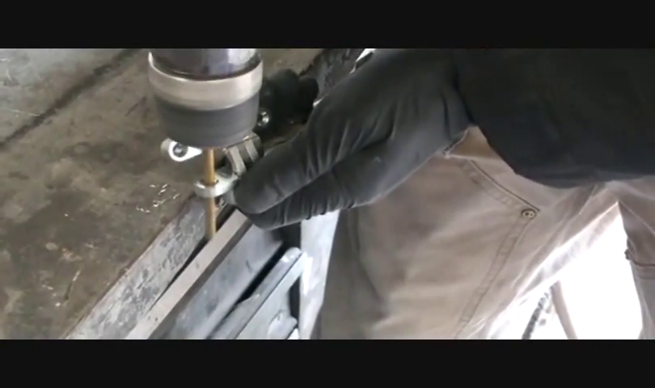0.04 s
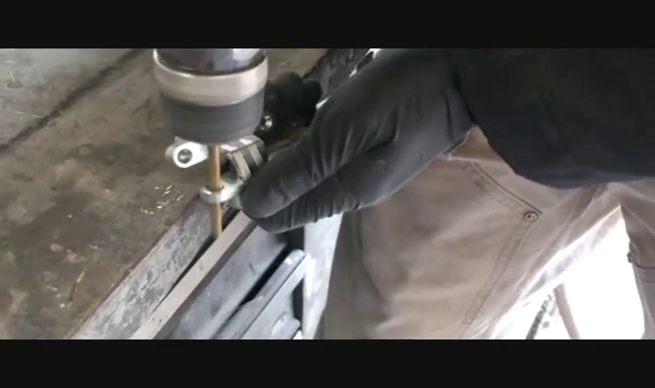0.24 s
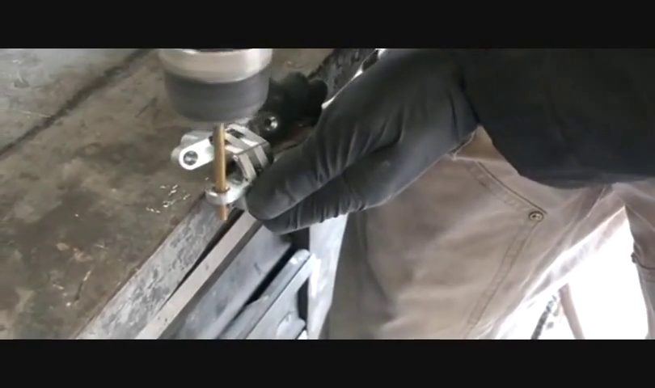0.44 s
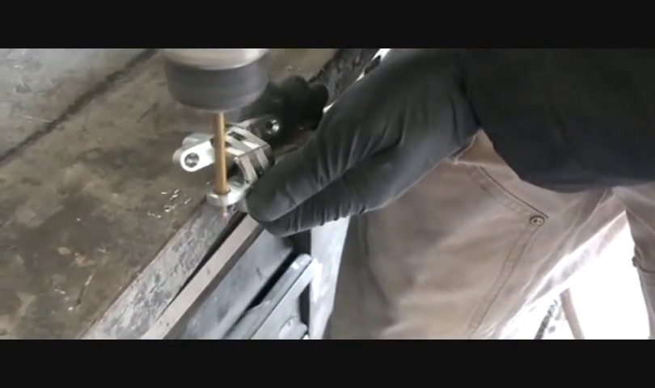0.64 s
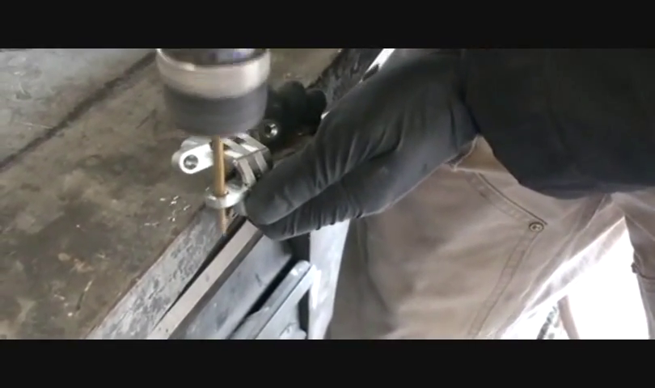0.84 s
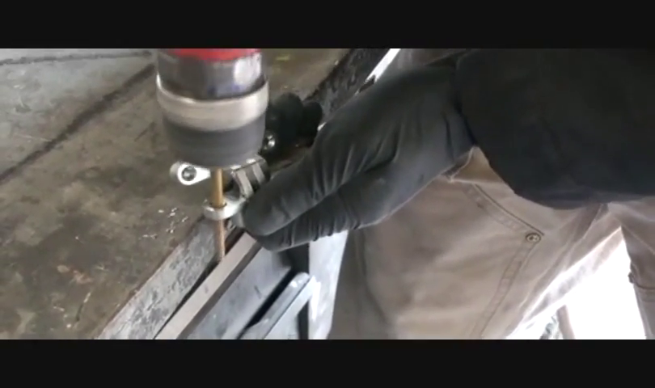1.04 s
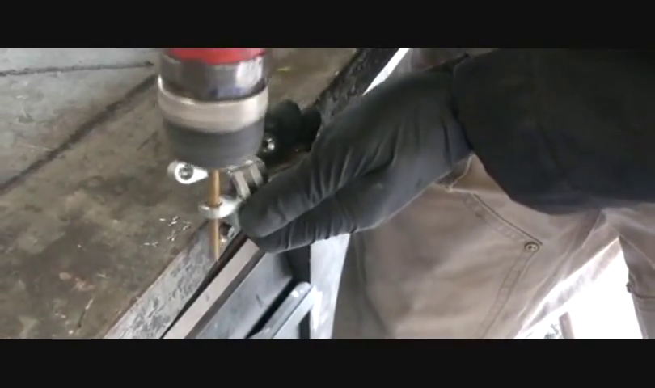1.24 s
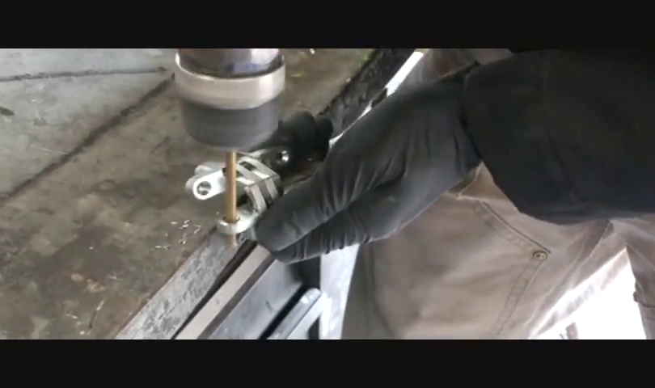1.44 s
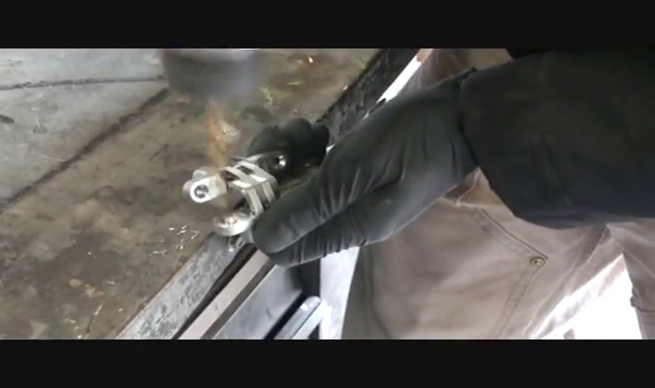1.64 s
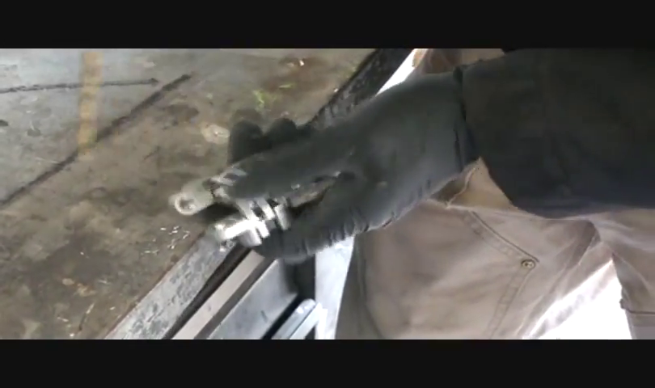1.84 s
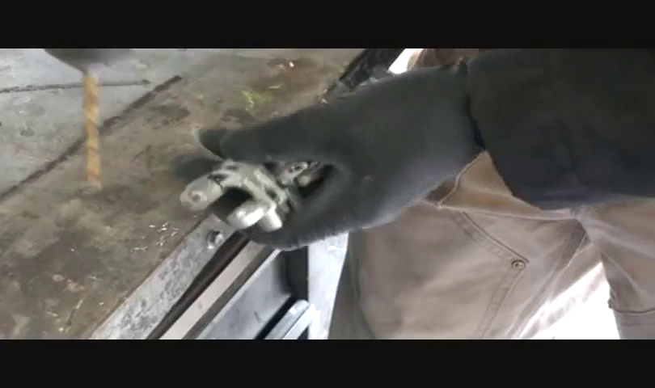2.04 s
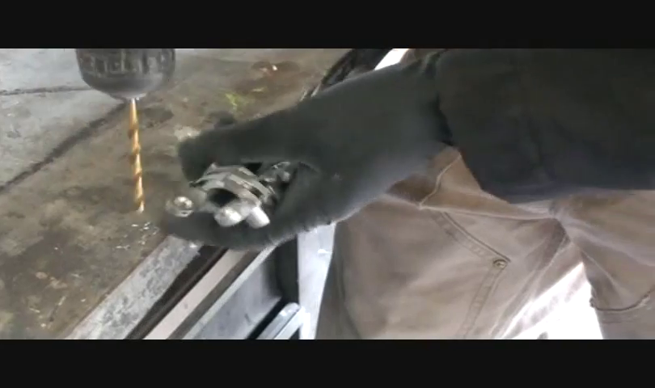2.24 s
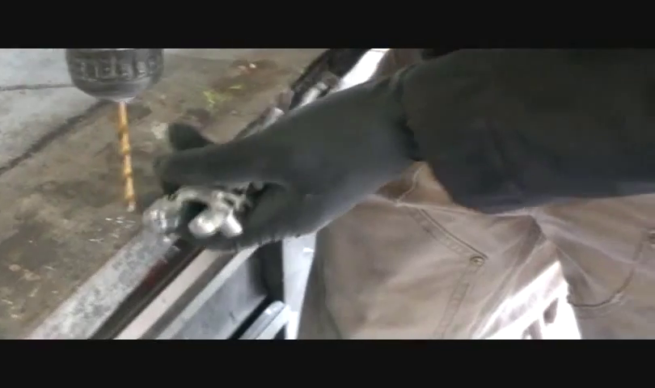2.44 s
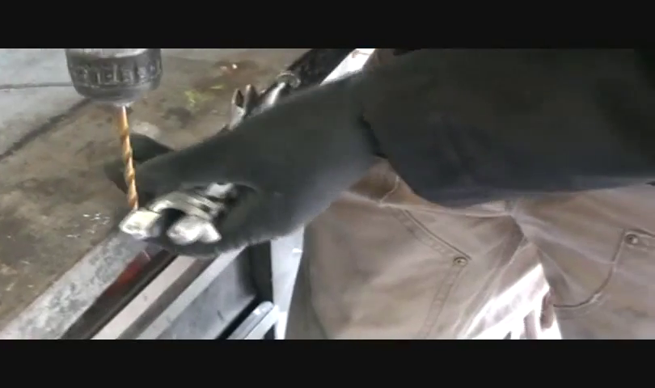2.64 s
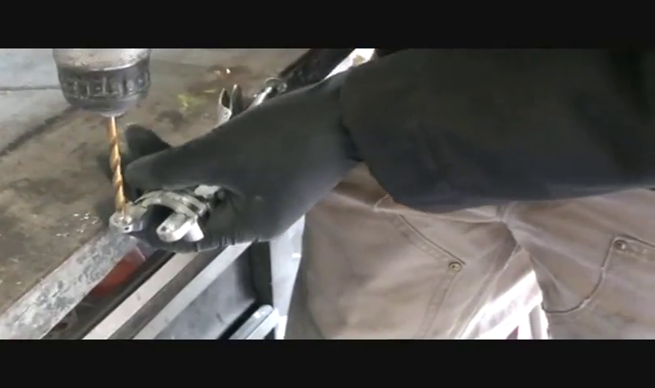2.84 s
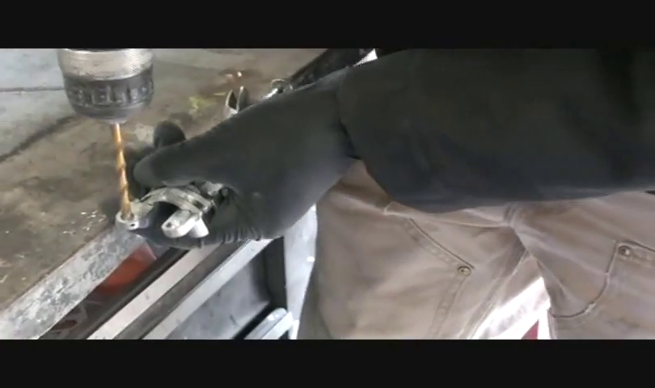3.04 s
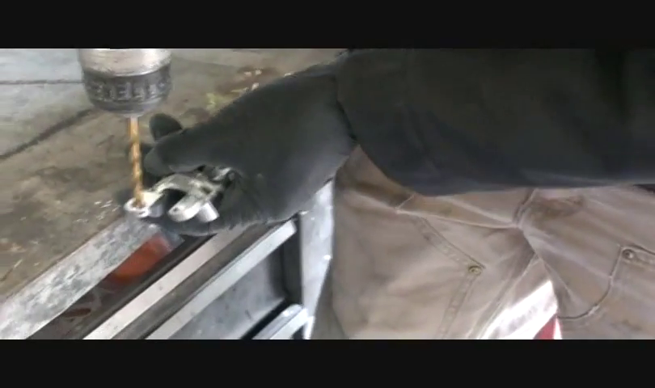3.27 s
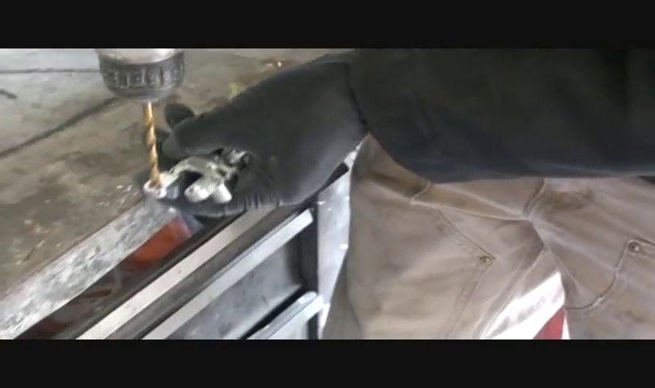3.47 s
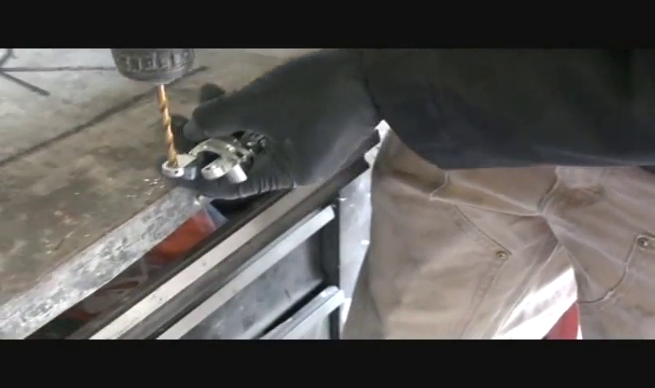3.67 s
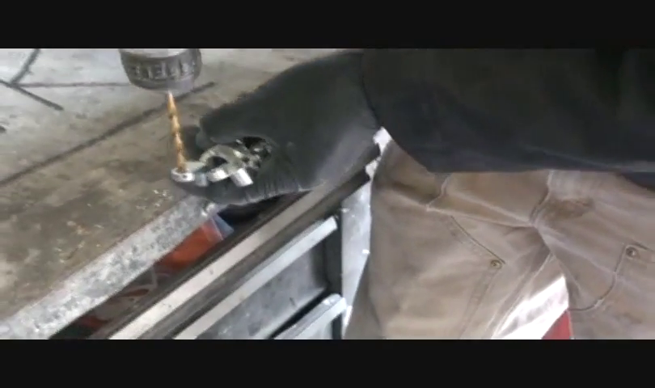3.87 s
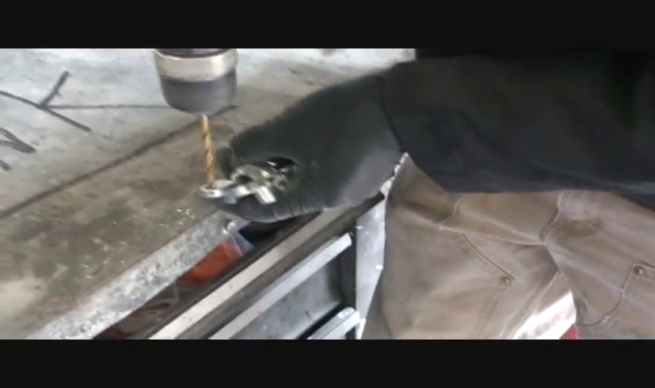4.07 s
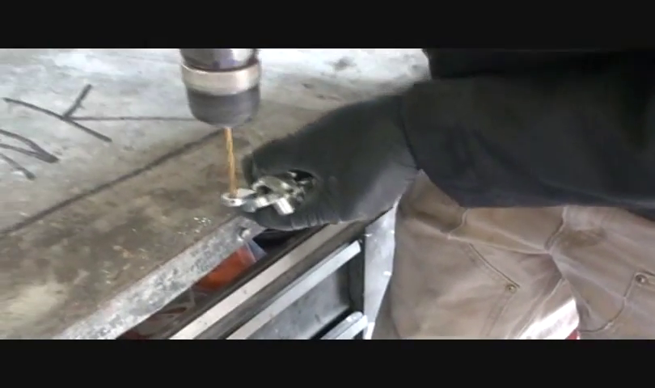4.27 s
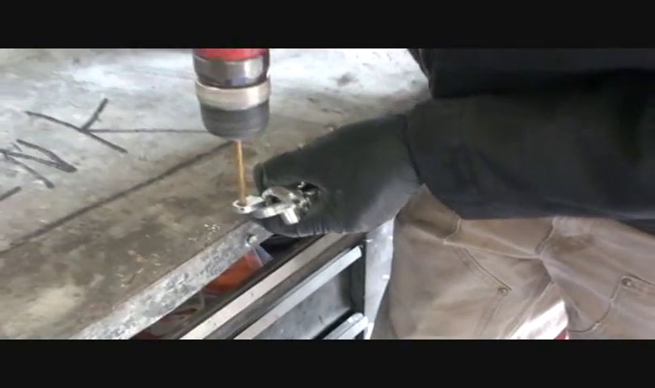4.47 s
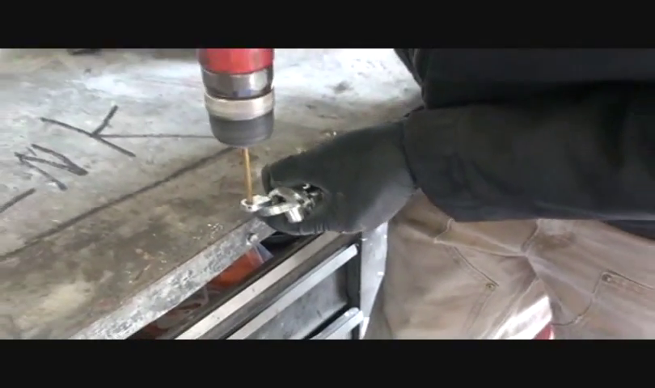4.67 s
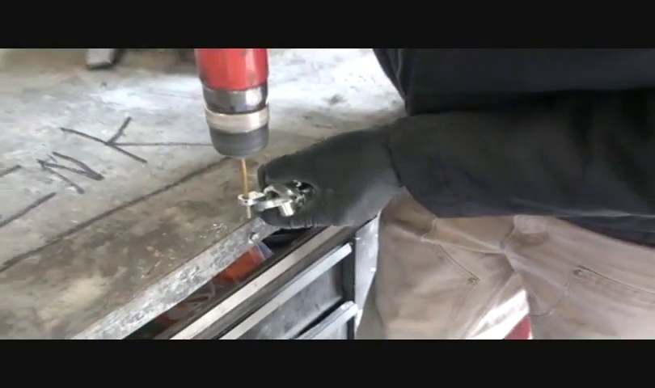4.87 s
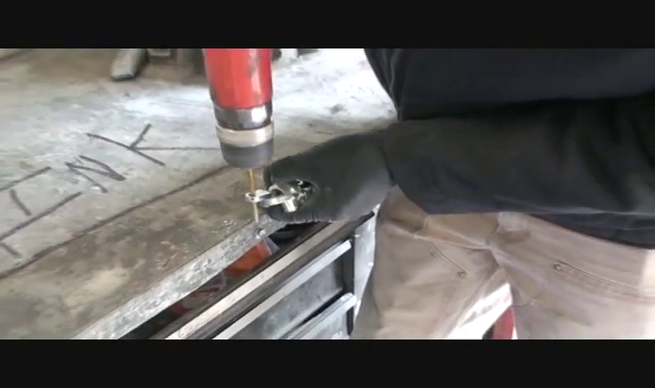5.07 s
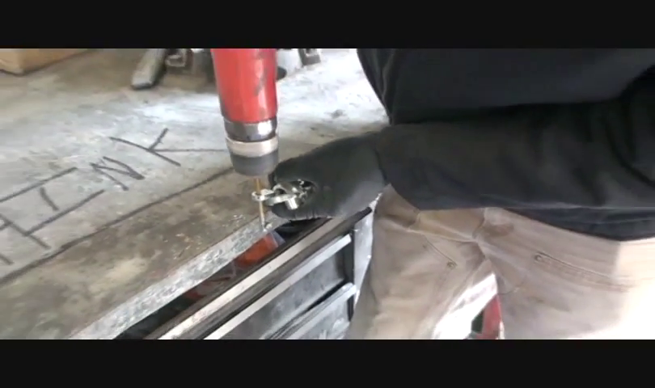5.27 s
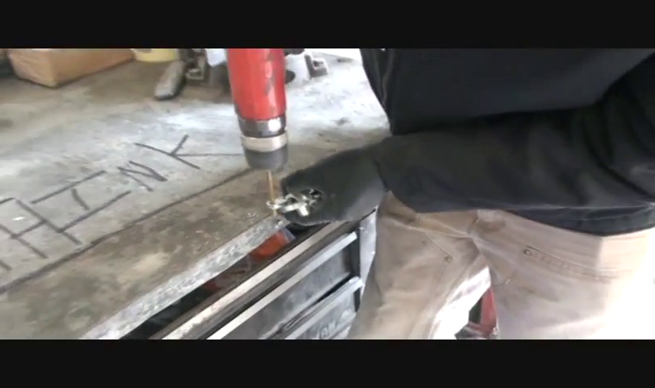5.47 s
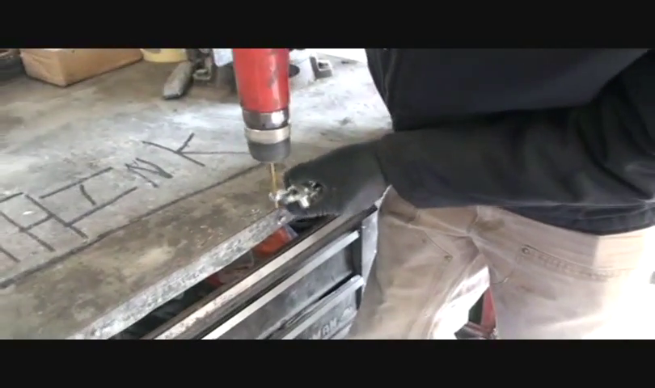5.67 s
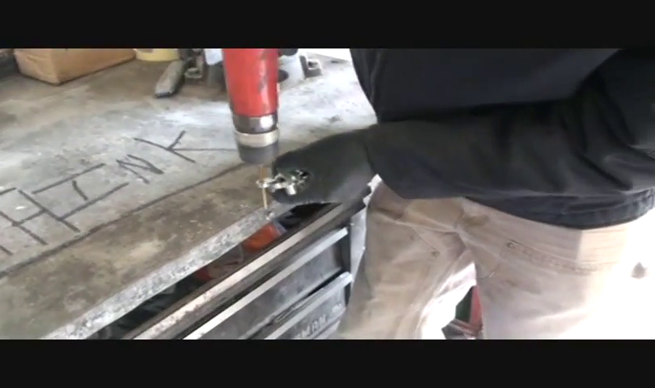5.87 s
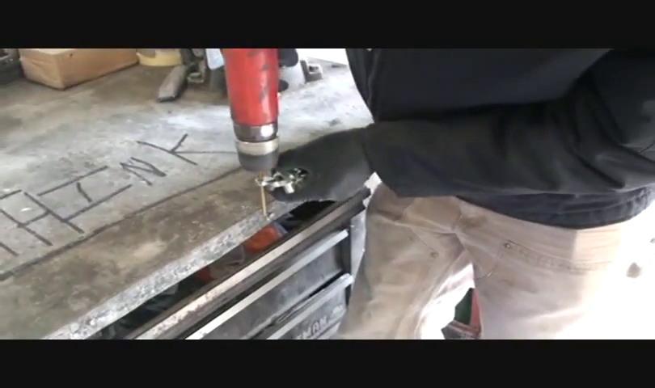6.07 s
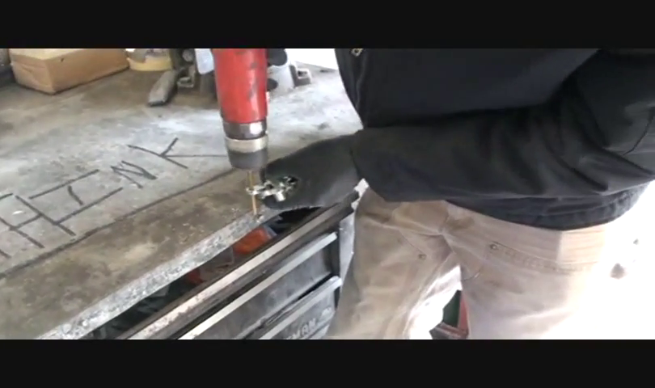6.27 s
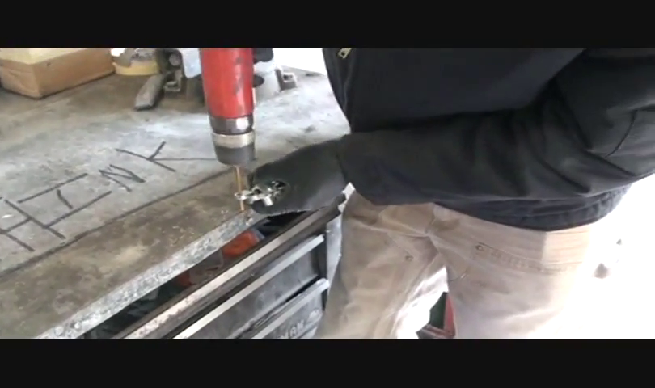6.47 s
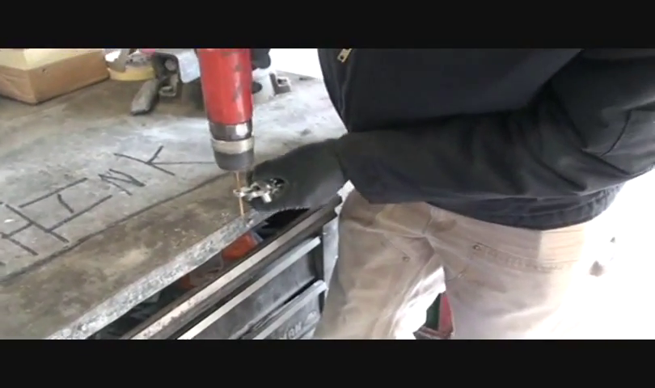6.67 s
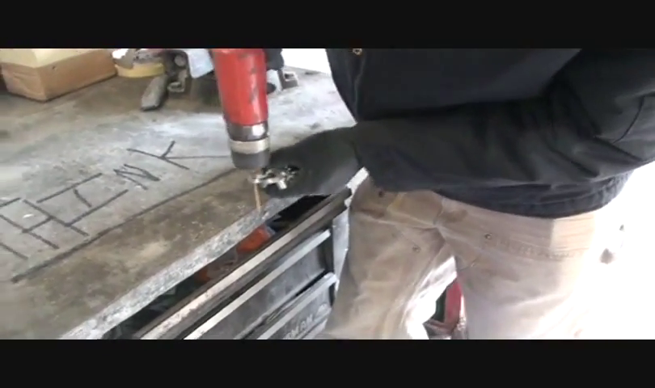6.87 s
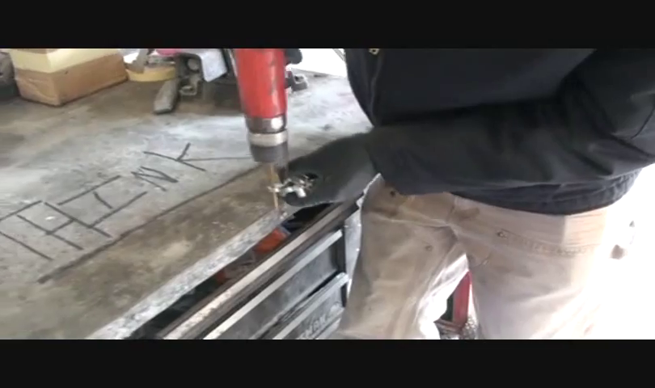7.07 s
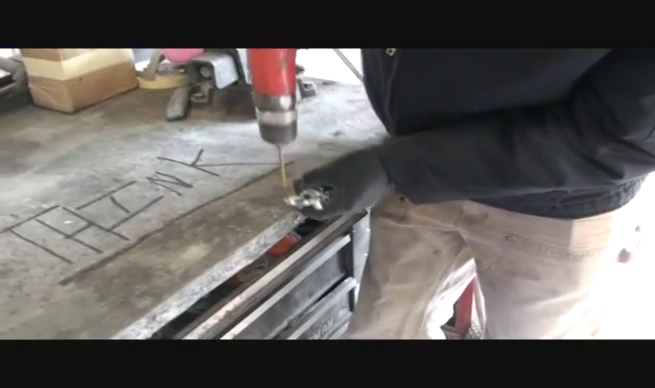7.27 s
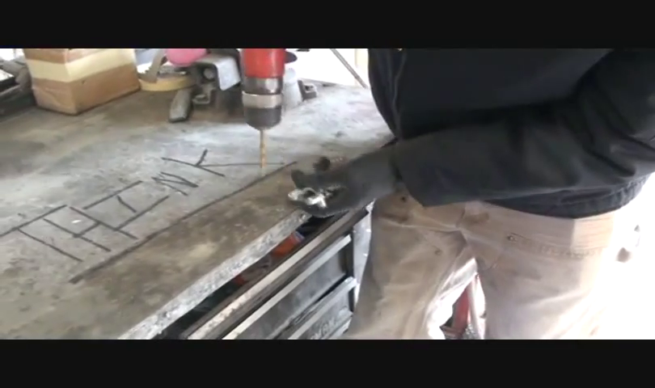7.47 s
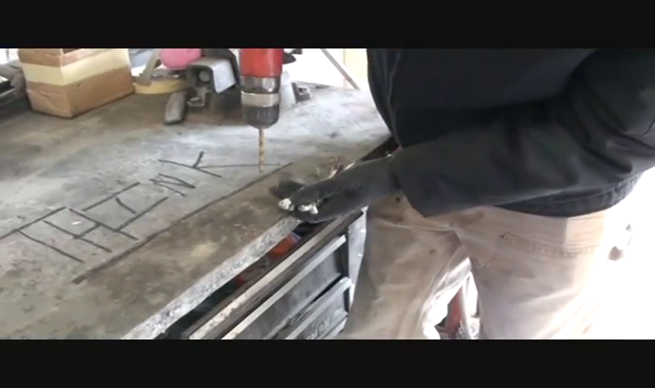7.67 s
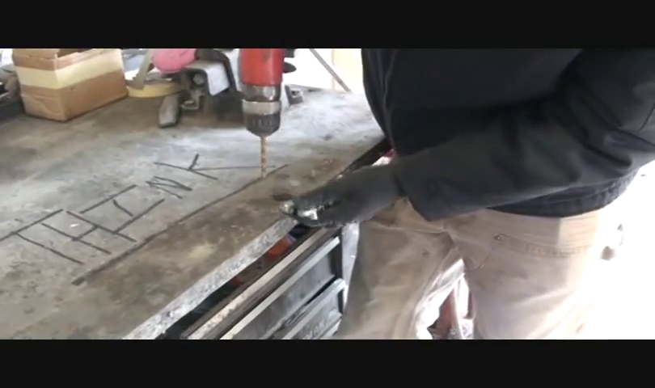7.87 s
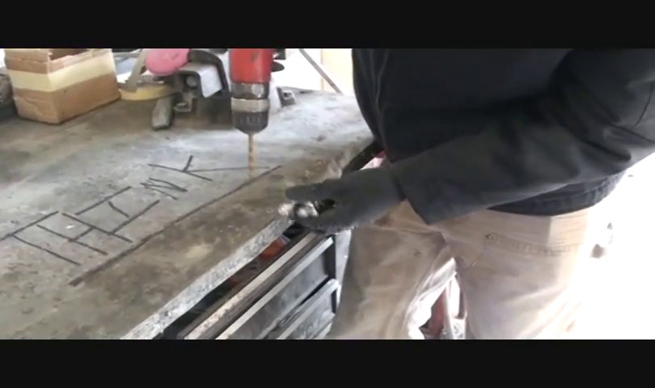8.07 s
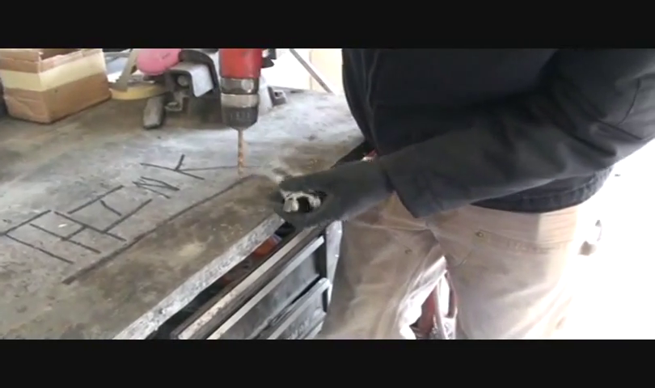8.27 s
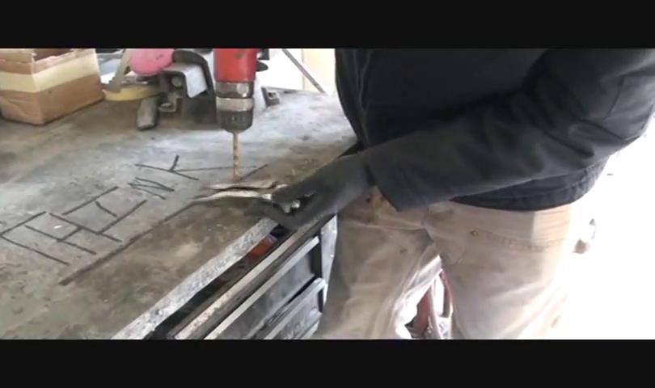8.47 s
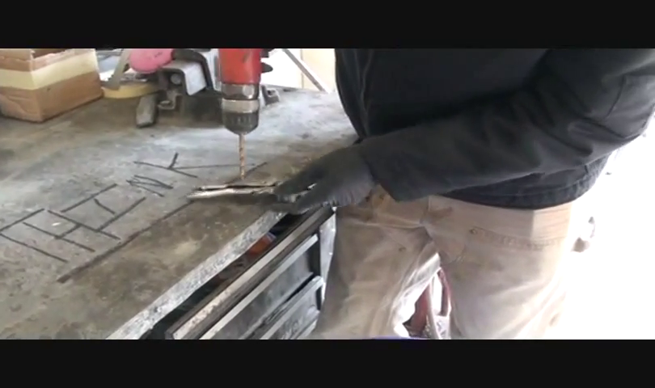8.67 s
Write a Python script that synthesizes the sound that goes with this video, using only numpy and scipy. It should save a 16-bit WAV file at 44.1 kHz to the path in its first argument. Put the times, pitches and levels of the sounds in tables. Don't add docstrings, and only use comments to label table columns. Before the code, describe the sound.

Heard from about an arm's length, a pneumatic drill holds a piercing, buzzy whistle with rushing air, wavering slightly under load. It cuts off and the steel-filled room rings briefly. Soft clicks and low thumps sit over faint shop noise. A tiny burst, a rough labouring burst at lower pitch, then a longer, hissier steady run follow. After it stops, quiet hiss ends with a sharp hinge clack.

```python
import sys
import numpy as np
from scipy import signal
from scipy.fft import rfft, irfft
from scipy.io import wavfile
from scipy.ndimage import uniform_filter1d

SR = 44100
rng = np.random.default_rng(int(sys.argv[2]) if len(sys.argv) > 2 else 0)


def magnitude_from_level(level_db):
    exponent = np.asarray(level_db, float) / 20
    return 10 ** exponent


def unload_wav(signal):
    wavfile.write(
        sys.argv[1],
        SR,
        np.round(np.clip(np.atleast_2d(signal).T, -1, 1) * 32767).astype(np.int16),
    )


N = 384111
STEP = 32
FINE_S = np.arange(N) / SR
CONTROL_S = np.arange(0, N, STEP) / SR
FREE_HZ = 757.2


def evened(x):
    return x / np.sqrt(np.mean(x ** 2) + 1e-20)


def read(points, hz):
    f, value = np.transpose(points)
    return np.interp(np.log(hz + 1), np.log(f + 1), value)


def curve(points):
    s, value = np.transpose(points)
    return np.interp(CONTROL_S, s, value)


def swell(t, s, half):
    return np.exp(-((t - s) / half) ** 2)


def wander(seconds):
    size = max(int(seconds * SR / STEP), 1)
    steps = rng.standard_normal(len(CONTROL_S))
    return evened(uniform_filter1d(uniform_filter1d(steps, size), size))


def noise(points, patchy_db, bins=10, frames=14, humps=()):
    hz = np.fft.rfftfreq(1024, 1 / SR)
    a, b, patches = rng.standard_normal((N // 256 + 5, 513, 3)).T
    patches = uniform_filter1d(uniform_filter1d(patches, bins, 0), frames, 1)
    colour_db = read(points, hz)
    for f, width, db in humps:
        colour_db = colour_db + db * np.exp(-(2 * (hz - f) / width) ** 2)
    z = (a + 1j * b) * magnitude_from_level(colour_db[:, None] + patchy_db * evened(patches))
    return evened(signal.istft(z, nperseg=1024, noverlap=768)[1][:N])


# on t/s, off t/s, valve left ajar 0-1, lower and upper exhaust resonance over the flow, level/dB
PULLS = [
    (-1, 1.695, 0, 19.5, 19.5),
    (4.027, 4.156, .03, 20, 21),
    (4.296, 4.881, .13, 20, 21.5),
    (4.933, 7.333, 0, 14.5, 23),
]
# from t/s, to t/s, speed lost/%, edge/s
BIT_LOADS = [(-.8, .84, .55, .8), (-1, 1.56, .25, .1), (.86, 1.2, .6, .17), (1.21, 1.55, 2.8, .165),
             (3.5, 4.93, 2.8, .15), (3.5, 5.4, 1.3, .35), (3.5, 6.35, .3, .1), (4.105, 4.42, 2.2, .05),
             (4.397, 4.724, 20, .012), (4.448, 4.724, 7.4, .02), (6.17, 6.3, 1.3, .05)]


def motor():
    valve_s, spin_s, coast_s = .009, .016, .057
    fill_s, bleed_s = .007, .027
    wake_s, surge_s, surge_db_per_s, fade_db_per_s = .017, .014, 210, 340
    t, dt = CONTROL_S, STEP / SR
    lost = sum(share / 100 * np.clip(np.minimum(t - start, end - t) / edge, 0, 1)
               for start, end, share, edge in BIT_LOADS)
    held = sum((t > on) & (t < off) for on, off, *_ in PULLS)
    ajar = sum(left * (t > on) * (t < off + .15) for on, off, left, *_ in PULLS)
    aim = FREE_HZ * (1 - lost)
    rate, valve, air, whine, since, out = aim[0], 1., 1., 1., 0., []
    for hz, on, left in zip(aim.tolist(), held.tolist(), ajar.tolist()):
        if on:
            valve += (1 - valve) * dt / valve_s
            since = 0.
            air += dt * (1 - air) / fill_s
            whine += dt * (1 - whine) / wake_s
        else:
            valve = left
            since += dt
            air += dt * (left - air) / bleed_s
            slope_db = surge_db_per_s if since < surge_s else -fade_db_per_s
            whine += dt * whine * slope_db / 8.686
        driven = valve * (hz - rate) / spin_s
        slowed = (1 - valve) * (rate - 20) / coast_s
        rate += dt * (driven - slowed)
        out.append((rate, air, whine))
    rate, air, whine = np.transpose(out)
    return rate, 20 * np.log10(air + 1e-9), 20 * np.log10(whine + 1e-9)


# t/s, half length/s, low partials, lower, upper resonance level/dB
BENCH_SWAYS = [(.05, .1, 0, -2, -1), (.76, .17, 0, 1, -9), (1.17, .06, 0, -3, 2), (1.43, .13, 0, 2, -5),
               (1.67, .055, 0, 0, -8), (4.06, .02, 0, 3, 0), (4.335, .02, 0, 3, 2), (4.37, .03, 0, -1, -3),
               (4.435, .02, -2, 2, 6), (4.765, .02, -2, -2, -10), (4.84, .04, 1, -1, 5),
               (4.895, .02, -5, -11, -2), (4.965, .025, 0, 4, 3), (5.12, .12, 4, -1, -1),
               (5.4, .35, 0, 0, -6), (5.4, .03, 0, -9, 0), (5.6, .08, 0, 0, -4), (6.11, .06, 0, -8, 0),
               (6.24, .05, 3, -15, 3), (6.59, .05, 0, -3, -3), (7.16, .075, 0, -10, 0),
               (7.29, .045, 0, -17, -3)]


def resonances(slow):
    spent_db = -11 * slow
    on, _, _, lower, upper = np.transpose(PULLS)
    pull = uniform_filter1d(np.searchsorted(on, CONTROL_S) - 1., size=20)
    low_db, lower_db, upper_db = sum(np.outer(db, swell(CONTROL_S, s, half)) for s, half, *db in BENCH_SWAYS)
    low_db = low_db + 8.8 + slow
    away = np.interp(slow, (.09, .25), [0, 1])
    lower_db += (1 - away) * np.interp(pull, range(4), lower) + away * (24 + spent_db)
    upper_db += (1 - away) * np.interp(pull, range(4), upper) + away * (16.5 + spent_db)
    return low_db, lower_db, upper_db


# first peak t/s, to t/s, catches f/Hz, share of the rate, upper resonance throb level/dB
CATCHES = [
    (1.05, 1.073, 19.8, .0089, -2.5),
    (1.3, 1.463, 23.7, .0085, 4),
    (4.512, 4.706, 17.5, .028, -2.5),
    (5.047, 5.235, 22.5, .0023, 4.5),
]


def bit_catches():
    factor, throb_db = 1., 0.
    for peak, end, chuck, share, db in CATCHES:
        turn = 2 * np.pi * chuck * (CONTROL_S - peak)
        catch = np.cos(turn) + .3 * np.sin(2 * turn) - .35 * np.sin(turn / 2)
        lead = CONTROL_S - peak + .043
        catch = catch * np.clip(np.minimum(lead, end - CONTROL_S) / .02, 0, 1)
        factor = factor * (1 + share * catch)
        throb_db = throb_db + db * catch
    return factor, throb_db


RULING_HZ = [1450, 2310, 2957, 3956]
# f/Hz, level/dB
EXHAUST_COLOUR = [(150, -22), (380, -12), (520, -6), (750, -3.7), (1100, -2.5), (1350, -11), (1515, -6.2),
                  (1575, -13.5), (1850, -1.5), (2250, -2), (2550, 3.5), (2750, -1), (3000, -2.5),
                  (3350, -3)]
# f/Hz, then level/dB four times
POSTURE_TOPS = [(3200, 2.5, 1, 3.5, 3.5), (3890, 5, -1, 4, 1), (4600, 1, -0.5, 1, 1),
                (5314, 12, 1, 8, -0.5), (5830, -3, -2.5, -1, 1), (6910, 2.5, 5.5, 10, -10.5),
                (7100, -14.5, -20, 2, -2.5), (8300, -28, -8.5, -11, -12), (9500, -16.5, -15.5, -19, -17.5),
                (13030, -22.5, -21.5, -23.5, -23.5)]
# t/s, posture column
HELD = [
    (0, 0),
    (2.9, 0),
    (3.1, 1),
    (6.15, 1),
    (6.27, 2),
    (6.75, 2),
    (6.88, 3),
]


def vane_whine(rate, turns, rough, air_db, whine_db, tuned_db):
    low_db, lower_db, upper_db = tuned_db
    top_hz, *tops_db = np.transpose(POSTURE_TOPS)
    posture = curve(HELD)
    whine = np.zeros(N)
    for k in range(1, 17):
        hz = k * rate
        place = np.interp(hz, RULING_HZ, range(4))
        low, lower, upper, flow = [np.clip(1 - abs(place - j), 0, 1) for j in range(4)]
        level_db = whine_db + flow * (air_db - whine_db) + read(EXHAUST_COLOUR, hz)
        level_db += low * low_db + lower * lower_db + upper * upper_db
        for j, db in enumerate(tops_db):
            level_db += np.clip(1 - abs(posture - j), 0, 1) * np.interp(hz, top_hz, db)
        level_db += (.4 if k < 5 else 1.8) * wander(.08)
        smear = np.minimum(rough * (k - .6) / 2.8, .95)
        blur = wander(.003) + 1j * wander(.003)
        size = magnitude_from_level(level_db) * (np.sqrt(2 - 2 * smear) + np.sqrt(smear) * blur)
        phase = 2 * np.pi * (k * turns + rng.random())
        whine += (np.interp(FINE_S, CONTROL_S, size) * np.exp(1j * phase)).real
    return whine


# delay/ms, gain, delay/ms, gain
NEAR_ECHOES = [(.9, 0.21, 0.63, 0.32), (3.1, 0.094, 2.6, 0.12), (5.3, -.25, 5.7, 0.272),
               (9.2, 0.44, 14, -0.14), (17, 0.112, 12, 0.22)]


def echoed(x):
    runs = np.zeros((2, 1200))
    runs[:, 0] = 1
    for early_ms, early, late_ms, late in NEAR_ECHOES:
        runs[0, round(early_ms * SR / 1000)] += early
        runs[1, round(late_ms * SR / 1000)] += late
    runs = runs / np.linalg.norm(runs, axis=1, keepdims=True)
    both = signal.oaconvolve(x[None], runs, axes=1)[:, :N]
    return np.where(FINE_S < 3, *both)


# f/Hz, level/dB per Hz
EARLY_HISS = [(150, -83), (250, -70), (680, -35), (755, -22), (912, -23.5), (1480, -18.5), (2090, -20),
              (2240, -15), (2400, -12.5), (2950, -9), (3390, -13.5), (5400, -13), (5790, -19.5),
              (7000, -21), (15500, -32.5)]
LATE_HISS = [(150, -82.5), (250, -83.5), (680, -17), (755, -12), (945, -10.5), (1400, -9), (1530, -12),
             (1640, -7), (1920, -12.5), (2200, 3), (2750, -0.5), (2950, 3), (3220, -2.5), (6880, -4),
             (15500, -25)]
# f/Hz, width/Hz, level/dB
EARLY_HUMPS = [(900, 190, -24), (1659, 50, -8.5), (2030, 40.2, -17.5), (2615, 136, 4), (3276, 240, -6),
               (3890, 80, -5), (4063, 300, 6.5), (6970, 280, 10.5), (7550, 200, -6), (8770, 900, 0)]
LATE_HUMPS = [(1640, 84, -9), (2340, 120, -16.5), (2467, 180, 7), (3590, 290, -4.5), (3905, 330, 7),
              (4320, 110, 9), (4300, 150, -2), (5570, 630, 1.5), (6060, 170, -14.5), (7500, 320, -3.5),
              (8170, 150, 4), (9010, 853, 4)]


def exhaust_hiss(turns, air_db):
    early = magnitude_from_level(11.5) * noise(EARLY_HISS, 1.9, humps=EARLY_HUMPS)
    late = magnitude_from_level(13) * noise(LATE_HISS, 1.1, humps=LATE_HUMPS)
    air = np.where(FINE_S < 3, early, late)
    puffs = 1 + 0.176 * np.cos(2 * np.pi * turns)
    return echoed(magnitude_from_level(np.interp(FINE_S, CONTROL_S, air_db)) * puffs * air)


def drill():
    full_flow_db = -32.5
    rate, air_db, whine_db = motor()
    slow = np.log2(FREE_HZ / rate)
    air_db = full_flow_db + air_db - 4 * np.minimum(slow, .6)
    whine_db = full_flow_db + whine_db
    low_db, lower_db, upper_db = resonances(slow)
    change = uniform_filter1d(abs(np.gradient(np.log(rate), CONTROL_S)), 30)
    rough = np.clip(0.0047 + .04 * change + 0.15 * (1 - rate / 755), 0, .9)
    factor, throb_db = bit_catches()
    rate = rate * factor * (1 + .0012 * wander(.01))
    turns = np.cumsum(np.interp(FINE_S, CONTROL_S, rate)) / SR
    tuned_db = low_db, lower_db, upper_db + throb_db
    return vane_whine(rate, turns, rough, air_db, whine_db, tuned_db) + exhaust_hiss(turns, air_db)


# f/Hz, t60/s, level/dB
WALLS = [(297, 0.32, 4), (992, 0.23, 6.5), (2150, 0.51, -7), (3000, 0.7, -8), (3980, 0.63, -1.5),
         (5300, .45, -4.5), (8070, 0.45, -3), (15000, 0.083, -10.5)]
# f/Hz, gain on pitch level/dB, t60/s
PANELS = [(3025, 2.5, .8), (3031, -2, .75), (3785, -15.5, 0.35), (2257, -14, .7)]


def room(x):
    taps = np.zeros(SR)
    at = np.arange(500, SR - 20, 20) + rng.integers(0, 20, (SR - 501) // 20)
    taps[at] = rng.choice([-1., 1.], at.shape)
    hz, t, z = signal.stft(taps, SR, nperseg=256)
    band_hz, t60, tone_db = np.transpose(WALLS)
    fade_db = np.interp(hz, band_hz, tone_db)[:, None] - 60 * t / np.interp(hz, band_hz, t60)[:, None]
    tail = signal.istft(z * magnitude_from_level(fade_db), SR, nperseg=256)[1][:SR]
    tail = tail / np.linalg.norm(tail)
    t = np.arange(SR) / SR
    for f, db, ring in PANELS:
        fade = magnitude_from_level(-60 * t / ring)
        tail = tail + magnitude_from_level(db) * 2 * fade / fade.sum() * np.sin(2 * np.pi * f * t)
    return signal.fftconvolve(x, tail)[:N]


# f/Hz, level/dB per Hz
EARLY_SHOP = [(18, -54), (30, -20.5), (168, -6.5), (420, -16), (606, -6), (673, -14), (767, -12.5),
              (1200, -7.5), (2830, -11), (3580, -17), (4530, -11), (5170, -13.5), (6710, -12), (11900, -14),
              (15500, -25.5)]
LATE_SHOP = [(18, -60.5), (30, -16), (137, -11), (341, -23.5), (492, -10.5), (767, -7.5), (851, -8.5),
             (1440, -13.5), (2420, -14.5), (2620, -9.5), (2910, -15), (6890, -11.5), (10500, -18.5),
             (11600, -14), (15500, -28.5)]
# f/Hz, width/Hz, level/dB
HOSE_LEAK = [(7000, 880, 3), (6080, 700, -2.5), (11900, 1100, 4.5), (9800, 1500, -1)]
# t/s, half length/s, level/dB
LOW_THUMPS = [(2.0, .03, -50), (2.21, .025, -40), (2.44, .03, -38), (2.82, .04, -57), (3.08, .12, -57),
              (3.41, .05, -45), (3.53, .08, -39), (3.78, .13, -45), (4.33, .03, -45), (4.57, .1, -36),
              (4.8, .15, -45), (5.03, .05, -33), (6.45, .08, -45), (7.96, .05, -61), (8.24, .05, -52),
              (8.38, .04, -61)]
# t/s, level/dB
DISTANT_RUSH = [
    (1.95, -72),
    (2.2, -64),
    (2.7, -55),
    (3.3, -59),
    (3.55, -54),
    (4.0, -55),
    (4.3, -58),
    (7.7, -62),
    (8.5, -57.5),
]


def shop():
    thumps = sum(magnitude_from_level(db) * swell(CONTROL_S, s, half) for s, half, db in LOW_THUMPS)
    thumps = np.interp(FINE_S, CONTROL_S, thumps)
    rush_db = np.interp(FINE_S, *np.transpose(DISTANT_RUSH))
    rumble = noise([(30, -53), (100, -4), (200, -4.5), (320, -6.5), (500, -44.5), (2000, -91.5)], 4.0, frames=6)
    rush = noise([(300, -26.5), (700, 0.5), (1300, 4.5), (2200, -28), (4000, -11.5), (9000, -65)], 2.5)
    early = magnitude_from_level(-50.5) * noise(EARLY_SHOP, 1.9, humps=HOSE_LEAK)
    late = magnitude_from_level(-49.5) * noise(LATE_SHOP, 1.6, humps=HOSE_LEAK)
    return np.where(FINE_S < 5, early, late) + magnitude_from_level(-12.5) * thumps * rumble + magnitude_from_level(rush_db) * rush


# t/s, peak level/dB, f/Hz, t60/s
HINGE_CLICKS = [(2.374, -37, 705, 0.04), (2.414, -36, 680, 0.024), (2.609, -44.5, 1090, 0.064),
                (2.63, -40, 1210, 0.04), (3.519, -51, 1319, 0.05), (3.9, -40, 759, 0.044),
                (3.99, -36, 2384, 0.04), (8.594, -15.5, 2455, 0.044), (8.596, -17.5, 2780, 0.044),
                (8.61, -23.5, 1312, 0.05), (8.699, -50.5, 1150, 0.036)]
# f/Hz, level/dB per Hz
CLICK_COLOUR = [(180, -54), (300, -26), (559, -3), (775, -8.5), (1060, 0.5), (1620, -1), (2780, 0),
                (4320, -6), (8460, -9.5), (15000, -33.5)]


def clicks():
    out, t = np.zeros(N + 8000), np.arange(8000) / SR
    colour = magnitude_from_level(read(CLICK_COLOUR, np.fft.rfftfreq(len(t), 1 / SR)))
    for s, db, hz, t60 in HINGE_CLICKS:
        burst = evened(irfft(rfft(rng.standard_normal(len(t))) * colour))
        ring = np.sin(2 * np.pi * hz * t)
        out[round(s * SR):][:len(t)] += magnitude_from_level(db - 60 * t / t60) * (.5 * burst + 0.4 * ring)
    return out[:N]


def scene():
    tool, ticks = drill(), clicks()
    ringing = room(magnitude_from_level(-17.5) * tool + magnitude_from_level(-14) * ticks)
    return (tool + ticks + ringing + shop())[None]


def top_cut(x):
    return signal.sosfilt(signal.butter(12, 15630, fs=SR, output="sos"), x)


def record(dry):
    shaved = dry - 1.22 * np.tanh(dry / 1.042)
    limited = dry - signal.sosfilt(signal.butter(2, 350, "high", fs=SR, output="sos"), shaved)
    mix = signal.sosfilt(signal.butter(2, 55, "high", fs=SR, output="sos"), limited)
    return top_cut(mix)


dry = scene()
out = record(dry)
unload_wav(out)
```